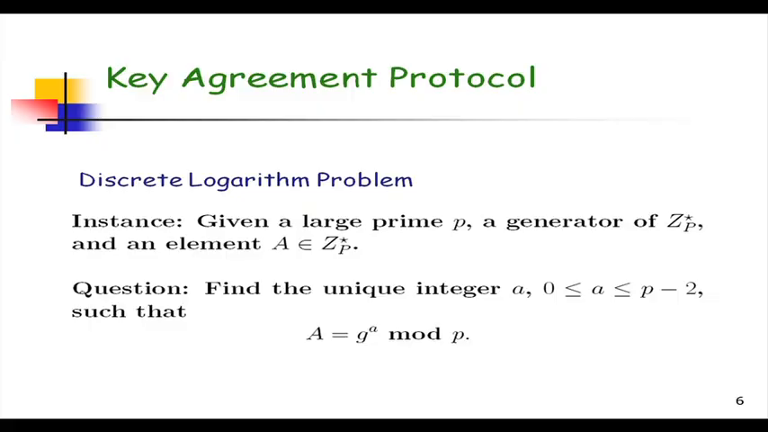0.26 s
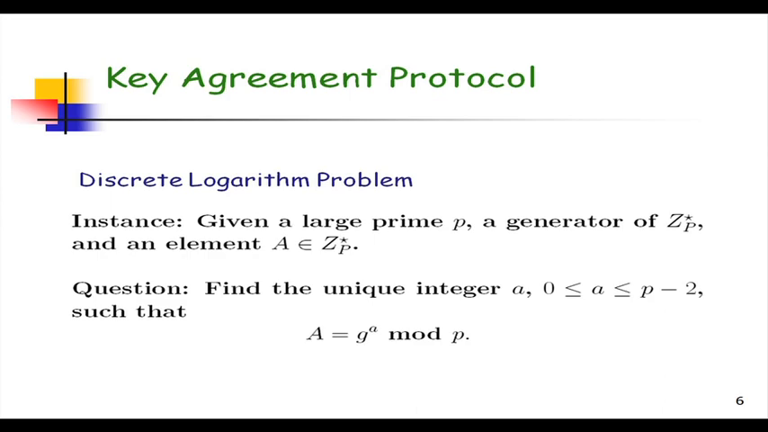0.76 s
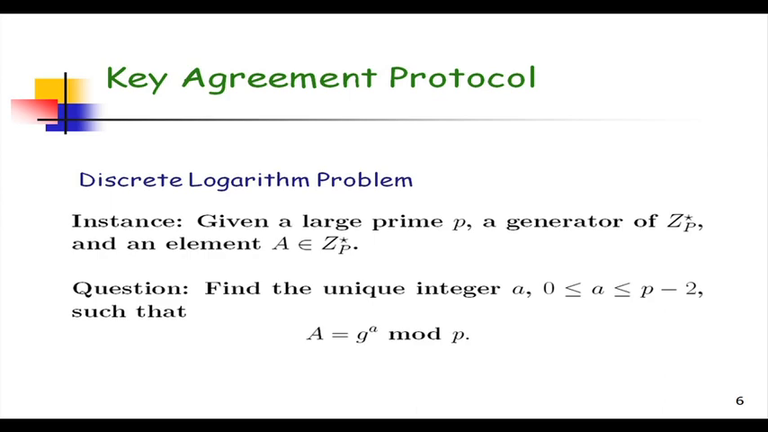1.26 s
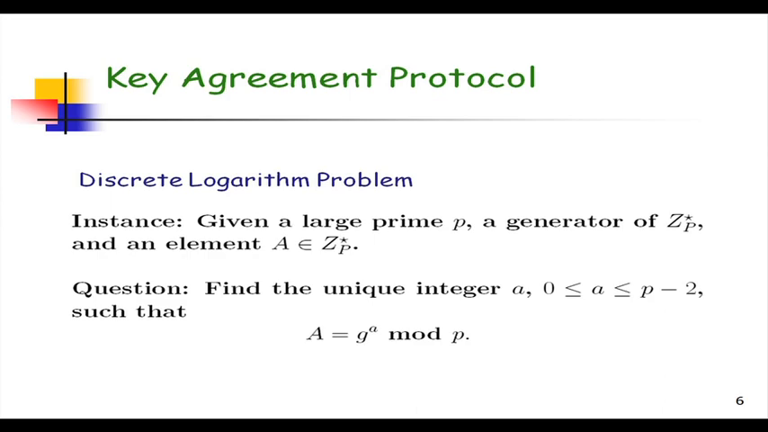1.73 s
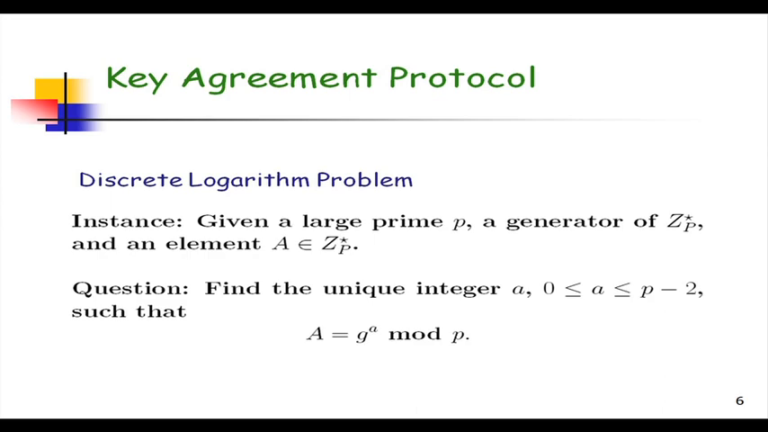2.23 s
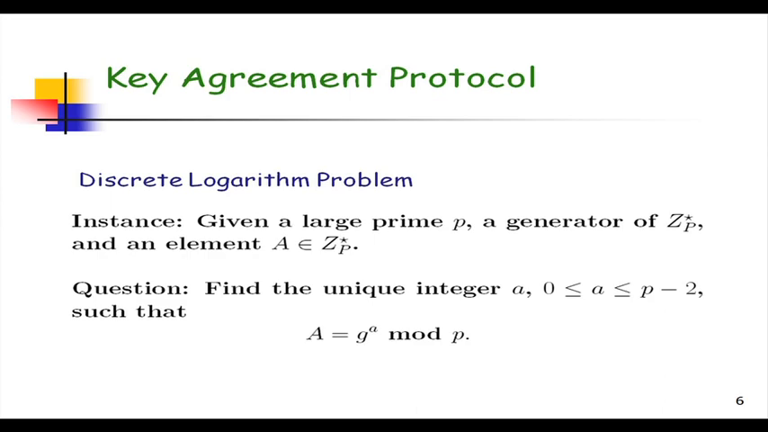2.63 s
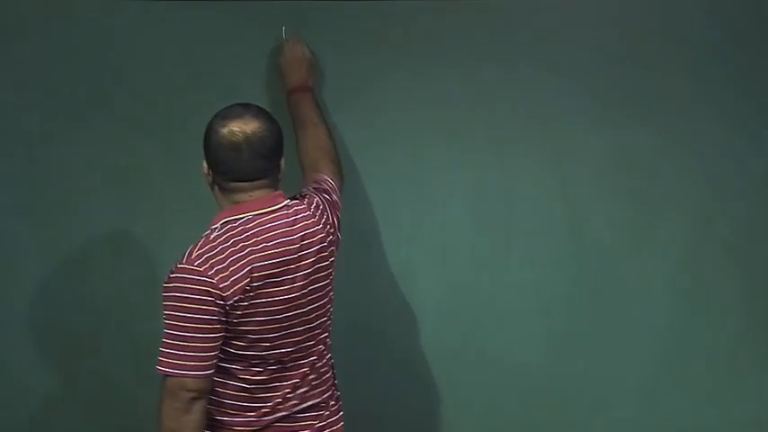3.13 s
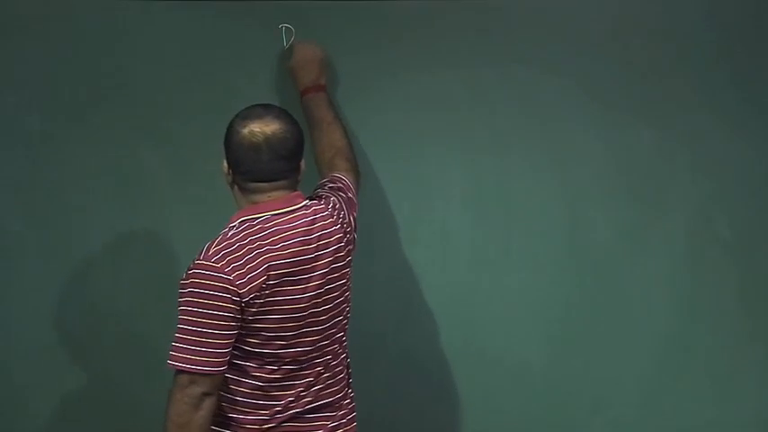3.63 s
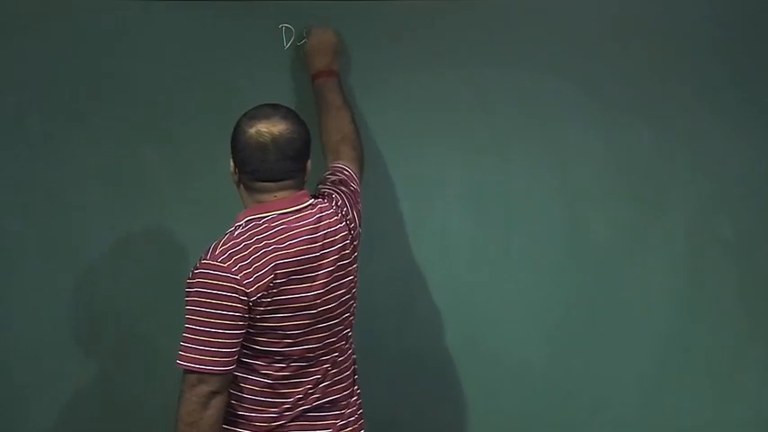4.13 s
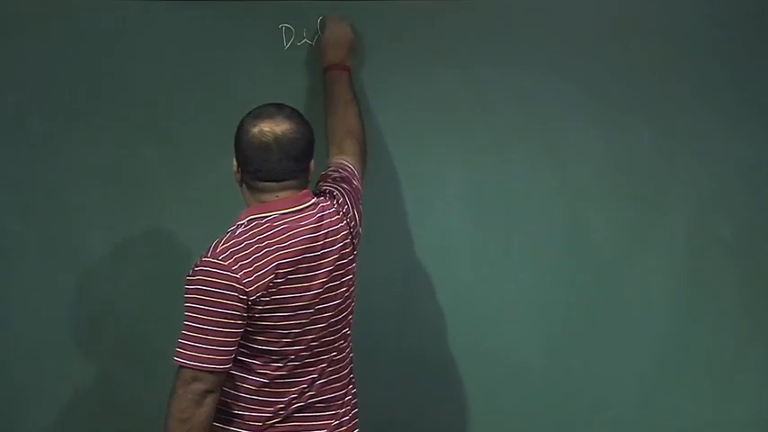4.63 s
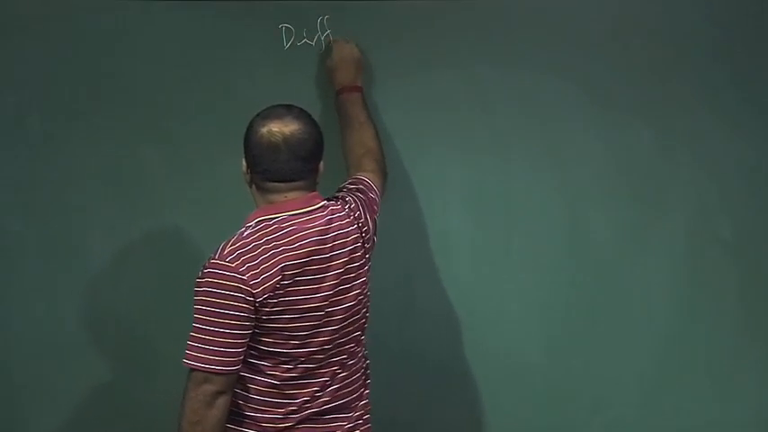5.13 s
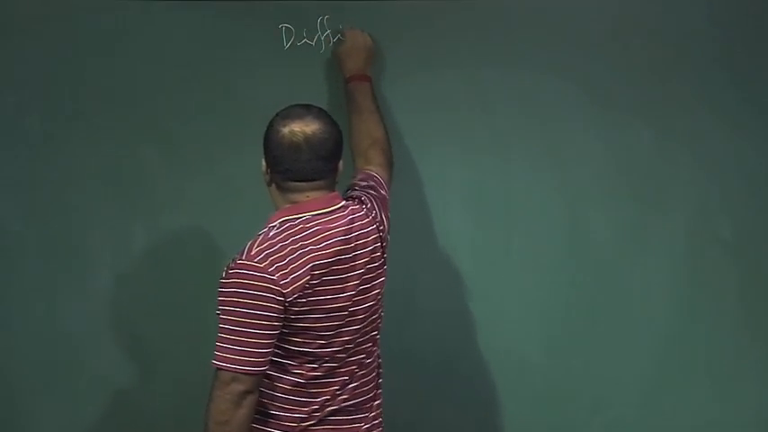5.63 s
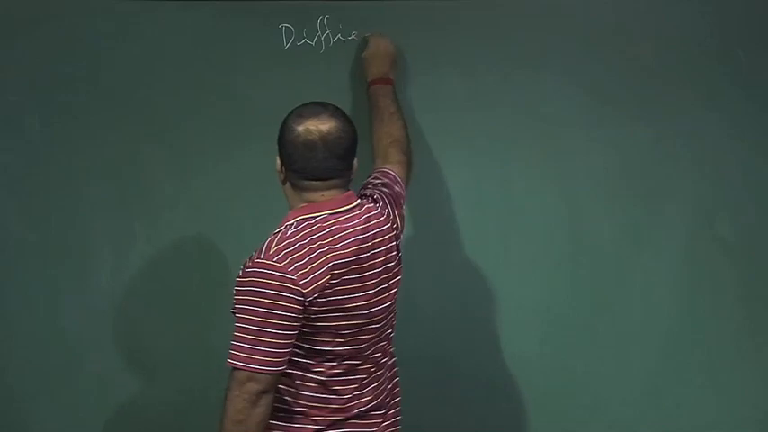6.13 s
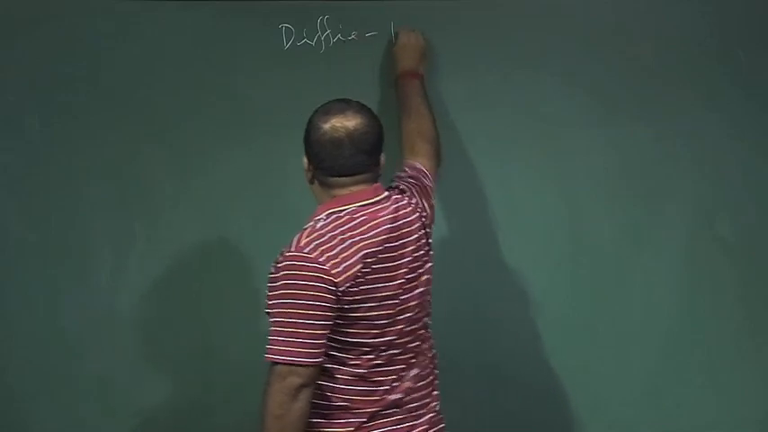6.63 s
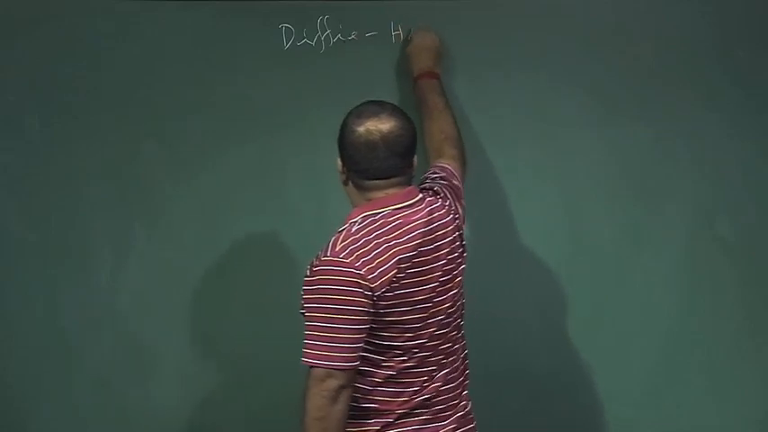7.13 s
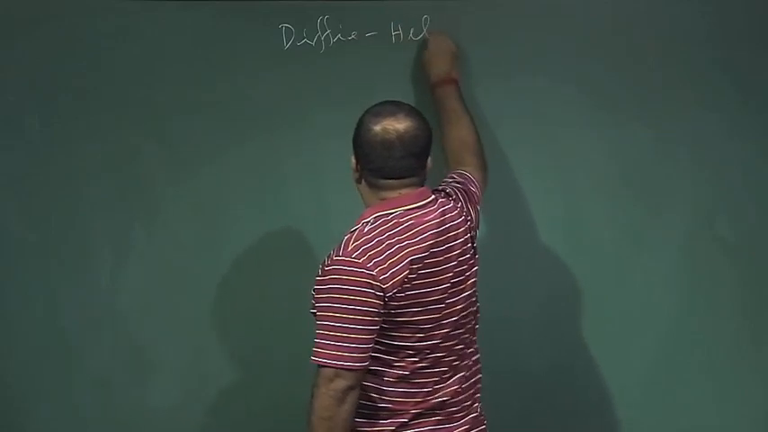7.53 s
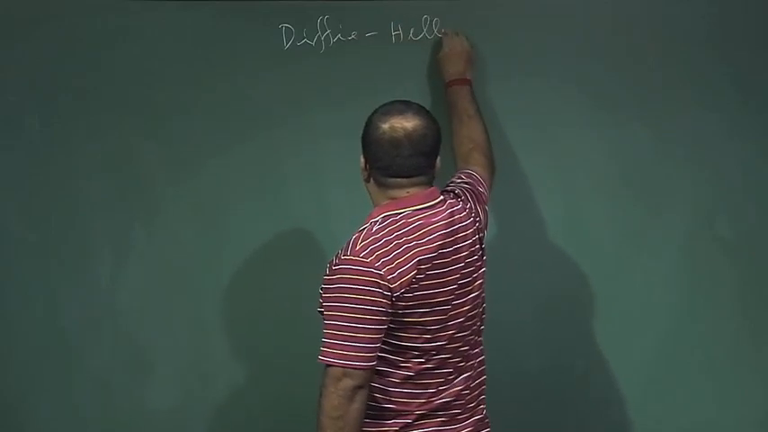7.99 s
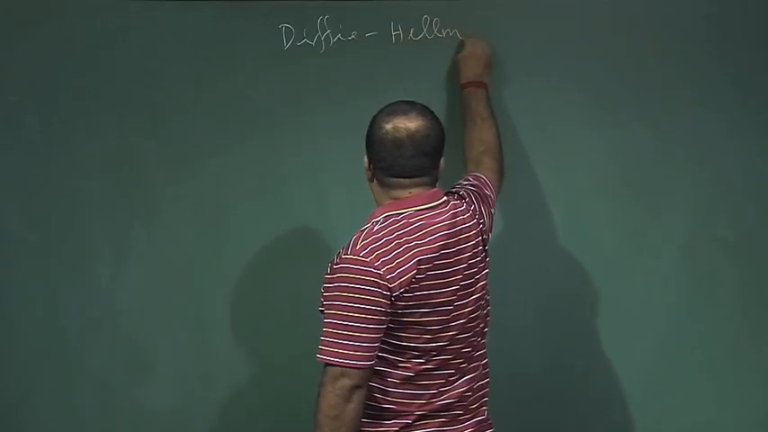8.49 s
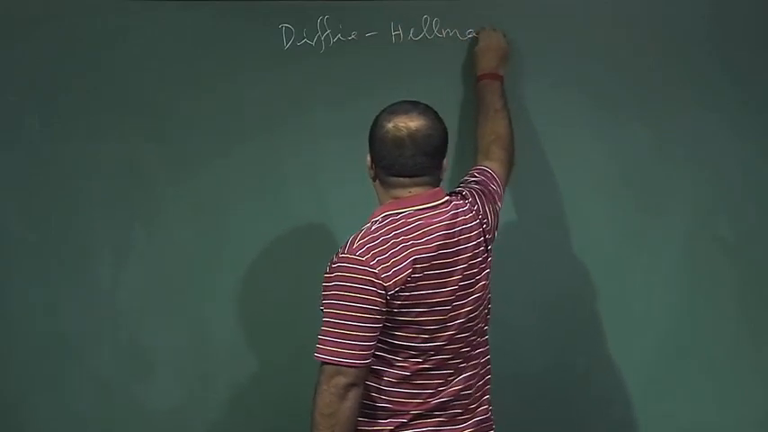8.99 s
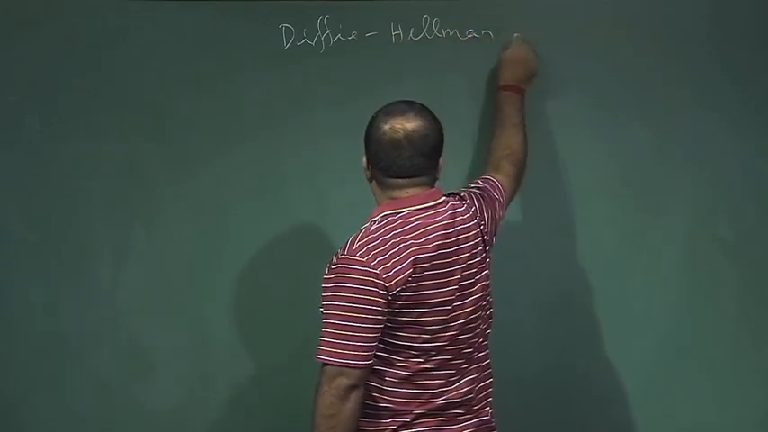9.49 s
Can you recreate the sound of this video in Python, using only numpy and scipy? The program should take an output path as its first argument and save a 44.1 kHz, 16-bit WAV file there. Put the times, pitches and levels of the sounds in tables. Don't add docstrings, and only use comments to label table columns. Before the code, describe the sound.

Close, dry cloth rubbing opens the scene as a shirt slides over a clipped-on microphone, strongest in the first 1.2 seconds, with a soft low bump near 0.5. From about 1.7 to 2.05 come tiny hard scrapes, then a faint click as chalk is lifted at 2.0. At 2.35 to 2.5 a cluster of deep, muffled thumps pushes on the capsule, the heaviest low event. The cloth quiets. At 3.0 a crisp chalk tap lands on the board, and writing continues with irregular taps, roughly two to five a second, until 7.0, strongest around 6.1. Between them are soft, gritty scratches and fizz. From 7.2 to 8.9 mostly light strokes remain, with isolated taps at 7.9 and 9.0. A last faint stroke fades around 9.35, with a slight sleeve creak near 9.7. Short room reverberation, low body rumble and quiet air persist throughout.

```python
import sys
import numpy as np
from scipy import signal
from scipy.io import wavfile
from scipy.ndimage import uniform_filter1d

SR = 44100
rng = np.random.default_rng(int(sys.argv[2]) if len(sys.argv) > 2 else 0)


def waveform_to_disk(signal):
    frames = np.transpose(np.atleast_2d(signal))
    scaled = np.clip(frames, -1, 1) * 32767
    samples = np.round(scaled).astype(np.int16)
    wavfile.write(sys.argv[1], SR, samples)


def convert_level_to_amplitude(level_db):
    exponent = np.asarray(level_db, float) / 20
    return 10 ** exponent


N = 429975


def evened(x):
    return x / np.sqrt(np.mean(x ** 2) + 1e-20)


def read(points, hz):
    f, *columns = np.transpose(points)
    return [np.interp(np.log(hz + 1), np.log(f), c) for c in columns]


def follow(rows):
    s, *columns = np.transpose(rows)
    return [np.interp(np.arange(N) / SR, s, c) for c in columns]


def add(mix, s, sound):
    part = mix[round(s * SR):][:len(sound)]
    part += sound[:len(part)]


def resonate(x, hz, width):
    turn = np.exp(2j * np.pi * np.cumsum(hz) / SR)
    r = np.exp(-np.pi * width / SR)
    return 2 * (turn * signal.lfilter([1 - r], [1, -r], x / turn)).real


def rung_twice(x, hz, width):
    return resonate(resonate(x, hz, width), hz, width)


def noise(colour, patchy_db, size=512):
    frames = 4 * N // size + 5
    hz = np.fft.rfftfreq(size, 1 / SR)
    a, b, patches = rng.standard_normal((frames, len(hz), 3)).T
    patches = uniform_filter1d(patches, size=9, axis=0)
    patches = evened(uniform_filter1d(patches, size=16, axis=1))
    z = (a + 1j * b) * convert_level_to_amplitude(read(colour, hz)[0][:, None] + patchy_db * patches)
    return evened(signal.istft(z, nperseg=size, noverlap=3 * size // 4)[1][:N])


def tail(bands, size, count):
    hz, t, z = signal.stft(rng.standard_normal(count), SR, nperseg=size)
    db, t60 = read(bands, hz)
    decayed = z * convert_level_to_amplitude(db[:, None] - 60 * t / t60[:, None])
    return signal.istft(decayed, SR, nperseg=size)[1][:count]


def move(length, top):
    u = np.arange(0, length, 1 / SR) / length
    top = np.clip(top, .02, .98)
    rise_and_fall = np.where(u < top, u / top, (1 - u) / (1 - top))
    return np.sin(np.pi / 2 * rise_and_fall) ** 1.2


def uneven_slips(count):
    return rng.standard_normal(count), np.minimum(rng.exponential(1, count), 4)


# hz, t60_s, level_db
RINGS = [
    (1400, 0.0036, -10.5),
    (1887, 0.0034, -2),
    (3280, 0.0015, 5.5),
    (4550, 0.0026, 5.5),
    (7190, .0013, 9.5),
    (10120, 0.00065, 12),
    (13460, 0.00087, 3),
]
# hz, level_db, t60_s
SCATTER = [(300, -21.5, 0.14), (864, 1.5, 0.13), (1190, -6, 0.12), (2130, -2, 0.071), (4000, -4.5, 0.071),
           (7000, -3.5, 0.017), (13600, -4.5, .025)]
# hz, level_db, t60_s
ROOM = [(300, -9.5, 1), (800, -10.5, 1), (1230, 0, 0.69), (1570, 2.5, .75), (2070, -5, 0.82),
        (2960, -4.5, 0.72), (5000, -7.5, 0.67), (7000, 4, 0.14), (13700, -1, 0.39)]
# delay_s, level_db
ECHOES = [(0.0126, -40), (0.0374, -21.5), (.062, -50)]


def tap(blow_db, low_db, high_db, tick_db, room_db):
    t = np.arange(30000) / SR
    u = t[:256]
    shares_db = 0, 0, low_db, high_db, tick_db, tick_db, tick_db
    peak_s = 0.00026
    rings = np.array([-np.cos(2 * np.pi * hz * (u - peak_s)) * convert_level_to_amplitude(db + share_db - 60 * u / t60)
                      for (hz, t60, db), share_db in zip(RINGS, shares_db)])
    rings *= np.sin(np.pi / 2 * np.clip(u / 0.00035, 0, 1)) ** 2
    rings[:2] *= np.clip(u / 0.0003, .3, 1)

    path = convert_level_to_amplitude(-18.5) * tail(SCATTER, size=64, count=len(t)) * np.clip(t / 0.00013, 0, 1)
    fill = np.clip((t - .018) / 0.045, .14, 1)
    path += convert_level_to_amplitude(room_db - 32) * tail(ROOM, size=256, count=len(t)) * fill
    path[0] = 1
    path[round(rng.uniform(.00018, .00025) * SR)] += .6
    path[round(rng.uniform(.0031, .0039) * SR)] += .24
    sound = signal.oaconvolve(path, rings.sum(0))[:len(t)]

    snap_hz, snap_s, snap_t60 = 1713, .00034, .007
    snap = convert_level_to_amplitude(-6.5 - 0.38 * (tick_db + 23.5) - 60 * u / snap_t60) * np.cos(2 * np.pi * snap_hz * (u - snap_s))
    sound[:256] -= snap * np.clip(u / snap_s, 0, 1) ** 2

    board_ring = np.sin(2 * np.pi * 1720 * u[:110]) * signal.windows.hann(110)
    for delay, db in ECHOES:
        add(sound, delay, convert_level_to_amplitude(db) * board_ring)

    swing = .1 + 1 - np.exp(-(t / .052) ** 1.6)
    low_swing = np.cos(2 * np.pi * swing) * np.exp(-t / .055) + .45 * np.exp(-t / .002)
    low_swing *= (1 - np.exp((peak_s - t) / 0.0001)).clip(0)
    return convert_level_to_amplitude(blow_db + 6.5) * (sound + convert_level_to_amplitude(-13.0) * low_swing)


# blow_db, low_ring_rel_db, high_ring_rel_db, tick_rel_db, room_rel_db
PICK_UP = (-29, -30, -36, -23, -5)
# start_s, blow_db, low_ring_rel_db, high_ring_rel_db, tick_rel_db
TAPS = [(3.0036, -18, 1, -30.5, -11.5), (3.318, -23.5, -8, -45, -18.5), (3.5208, -38.5, -40, -28, -36),
        (3.6589, -15.5, -27, -12.5, -15), (4.0386, -15.5, -2.5, -13.5, -16), (4.2161, -18, -1, -7.5, -11.5),
        (4.491, -19, 0, -14.5, -13), (4.6657, -18.5, 2, -6.5, -11.5), (4.9544, -18, -5.5, -8.5, -15.5),
        (5.1505, -20, -40, -9.5, -17.5), (5.5297, -15, 1.5, -23, -12.5), (5.7068, -20.5, -42, -9, -20),
        (6.0857, -13, -9.5, -14, -12.5), (6.2985, -15.5, 2, -16, -9), (6.568, -15, -1.5, -18, -11),
        (6.8214, -16.5, -8.5, -13.5, -13), (7.0072, -17, -10.5, -10.5, -11),
        (7.9126, -18.5, -14.5, -28, -20.5), (8.9953, -16, -16.5, -30, -23)]


def landings():
    out = np.zeros(N)
    lag_s = 0.000938
    add(out, 2.022 + lag_s, tap(*PICK_UP))
    for s, blow_db, *shares_db in TAPS:
        room_db = 1.8 + 0.65 * max(-22.5 - blow_db, 0)
        add(out, s + lag_s, tap(blow_db, *shares_db, room_db))
    return out


# start_s, length_s, fizz_db, stick_resonance_hz, drag_rel_db
STROKES = [(3.065, 0.15, -68, 4400, 7), (3.333, 0.095, -62.5, 3700, -2), (3.404, .11, -59.5, 4340, -17),
           (3.723, 0.072, -77, 3980, -2), (3.848, .12, -77, 4060, -5), (4.3, 0.13, -72, 4000, -2),
           (4.74, 0.28, -68.5, 3800, 4), (5.195, 0.076, -69, 4190, -3), (5.287, 0.16, -73, 4130, -1),
           (5.742, 0.16, -76, 3750, 14), (5.9, 0.073, -74, 3760, 4), (7.202, 0.16, -70.5, 4340, 3),
           (7.313, 0.093, -66.5, 3500, 8.5), (7.387, 0.084, -66, 4200, -5), (7.444, 0.16, -67.5, 4500, -5),
           (7.57, 0.1, -72, 3630, 16), (7.647, 0.14, -61.5, 4530, -1.5), (7.771, 0.066, -69, 4400, 1),
           (8.045, .16, -78, 3650, 6), (8.252, .11, -73, 3660, 2), (8.387, 0.29, -71.5, 4540, -2),
           (8.562, 0.26, -71, 4650, 3), (8.79, 0.13, -72.5, 4670, .6), (9.132, 0.24, -79, 3900, 6)]
# multiple_of_resonance, width_hz, level_db
STICK = [(1, 603, 3), (1.72, 1400, -12), (2.4, 1400, -17.5), (2.9, 1567, -18)]
# hz, level_db_per_hz
GRIT = [(200, 3), (1000, 0), (1800, 2.5), (3000, 7), (8000, -15), (16000, -27)]
# hz, level_db_per_hz
FIZZ = [(2000, -19), (4000, 8.5), (7000, 5), (12000, -3.5), (15000, -9), (16500, -17)]


def strokes():
    speed, load = np.zeros(N), np.zeros(N)
    u = np.arange(SR // 2) / SR
    wait_s, rise_s, fall_s = 0.059, 0.048, 0.13
    pull = (1 - np.exp(-(u / rise_s) ** 2)) * np.exp(-u / fall_s)
    for s, blow_db, _, _, tick_db in TAPS:
        add(speed, s + wait_s, convert_level_to_amplitude(-43 + blow_db + 0.31 * tick_db) * pull)
    load += convert_level_to_amplitude(5.5) * speed
    for s, length, db, _, drag_db in STROKES:
        add(speed, s, convert_level_to_amplitude(db) * move(length, 0.59))
        add(load, s, convert_level_to_amplitude(db + drag_db) * move(length, 0.59))

    stroke_hz = [(s + length / 2, hz) for s, length, _, hz, _ in STROKES]
    pull_hz = [(row[0] + rise_s, 3900) for row in TAPS]
    hz, = follow(sorted(stroke_hz + pull_hz))
    slips, spread = uneven_slips(N)
    slips = slips * convert_level_to_amplitude(2.5 * spread)
    ring = sum(convert_level_to_amplitude(db) * evened(rung_twice(slips, k * hz, width)) for k, width, db in STICK)
    drag, fizz = noise(GRIT, patchy_db=1.5), noise(FIZZ, patchy_db=2.1)
    return speed * (1.08 * fizz + convert_level_to_amplitude(-7.0) * ring) + load * drag


# start_s, level_db, pitch_hz
CRUMBS = [
    (1.29, -38, 7000),
    (2.095, -45, 11100),
    (3.377, -39, 9000),
    (3.868, -40, 5000),
    (7.801, -39, 5000),
    (8.898, -43, 4470),
]


def crumbs():
    out, u = np.zeros(N), np.arange(64) / SR
    for s, db, hz in CRUMBS:
        add(out, s, convert_level_to_amplitude(db - 60 * u / 0.0013) * np.sin(2 * np.pi * hz * u))
    return out


# start_s, length_s, fine_rub_db, fastest_point_share (0-1)
RUB = [(-.15, 0.5, -55, 0.43), (0.255, 0.32, -55.5, 0.72), (.5, 0.4, -56, 0.31), (0.845, 0.34, -53.5, 0.19),
       (1.285, 0.24, -61.5, 0), (1.724, 0.13, -61.5, 0.3), (1.846, 0.2, -61, 0.18), (2.02, .33, -65.5, 0.7),
       (2.407, 0.19, -67.5, 0.8), (2.578, 0.15, -67.5, 0.65), (2.77, 0.37, -76, 0.2),
       (9.67, 0.08, -77, 0.2)]
# hz, level_db_per_hz
FINE = [(1180, -3), (2000, -7.5), (2280, -1), (2460, -4), (3980, -4), (5780, -1.5), (7570, -7.5),
        (13100, -11.5), (15200, -16), (16000, -23)]
# start_s, coarse_rub_db
ARM = [(0, -60), (.7, -61.5), (1.15, -62), (1.3, -58), (1.75, -60), (1.85, -63), (2.15, -55.5), (2.36, -65),
       (2.99, -64.5)]
# hz, level_db_per_hz
COARSE = [(120, -39), (200, -9), (254, -4), (414, 1), (499, -4), (1310, -8), (3070, -21), (4000, -21),
          (5200, -42), (8800, -120)]


def shirt():
    arm_moves = np.arange(N) / SR < ARM[-1][0]
    slide = convert_level_to_amplitude(-77) * arm_moves
    for s, length, db, top in RUB:
        heard = move(length, top)[round(max(-s, 0) * SR):]
        add(slide, max(s, 0), convert_level_to_amplitude(db) * heard)
    fine, coarse = noise(FINE, patchy_db=1.3), noise(COARSE, patchy_db=1.4)
    return slide * fine + arm_moves * convert_level_to_amplitude(follow(ARM)[0]) * coarse


def pulses(events):
    out, t = np.zeros(N), np.arange(-3000, 3000) / SR
    for s, db, hz, cycles in events:
        envelope = np.exp(-(1.55 * t * hz / cycles) ** 2)
        add(out, s + t[0], convert_level_to_amplitude(db) * np.sin(2 * np.pi * hz * t + 3.1) * envelope)
    return out


# centre_s, level_db, pitch_hz, length_cycles
BUMPS = [(0.482, -27.5, 51.3, 1.2), (0.834, -37.5, 91, 0.8), (2.363, -25.5, 84, 1.45),
         (2.385, -17.5, 35.3, 0.57), (2.403, -21.5, 154, 1.54), (2.424, -13.5, 53, 0.98),
         (2.455, -16, 34.5, .8), (2.478, -9.5, 56, 0.52), (2.49, -20.5, 116, 1.16), (2.41, -41, 255, 3),
         (2.495, -42, 263, 2), (2.523, -24, 40, 1.3), (7.162, -33.5, 162, 0.84)]


def bumps():
    return pulses(BUMPS)


# start_s, level_db, length_s, spit_rel_db
SCRAPES = [
    (1.743, -44.5, 0.023, -14),
    (1.762, -45, 0.031, -8),
    (1.865, -48, 0.0041, -18),
    (1.896, -47, 0.0071, -5.5),
    (2.029, -48, 0.0092, -42),
]
# hz, width_hz, level_db
EDGE = [(1430, 96, -5.5), (3060, 140, -12.5), (4770, 55, -16), (5800, 49, -25), (7550, 170, -24)]


def scrapes():
    count_all = N // 4
    slips, spit = np.zeros((2, count_all))
    for s, db, length, spit_db in SCRAPES:
        count = round(length * SR)
        run = convert_level_to_amplitude(db + 4.1 * rng.standard_normal(2000)) * rng.choice([-1, 1], 2000)
        run = run[:count] * signal.windows.tukey(count, .4)
        add(slips, s, run)
        add(spit, s, convert_level_to_amplitude(spit_db) * run)
    flat = np.ones(count_all)
    ring = sum(convert_level_to_amplitude(db + 14.5) * rung_twice(slips, hz * flat, width + 550) for hz, width, db in EDGE)
    return np.pad(ring + resonate(spit, 8500 * flat, 8000), (0, N - count_all))


# start_s, length_s, level_db, pitch_hz, width_hz
CREAKS = [(0.302, .35, -63.5, 1070, 200), (1.172, 0.57, -64.5, 1330, 250), (1.279, 0.23, -66, 2050, 300),
          (2.045, 0.38, -70, 3540, 250), (2.76, 0.25, -70, 1160, 300), (3.419, 0.11, -57.5, 4350, 700),
          (5.883, 0.12, -55, 444, 400), (7.578, 0.22, -64, 1750, 300), (8.384, .18, -70, 4500, 800),
          (8.498, 0.15, -66, 2730, 900), (8.578, 0.25, -72, 1230, 120), (8.583, 0.22, -68, 4700, 700),
          (8.776, 0.14, -72, 4550, 700), (7.247, .12, -70, 8000, 1500), (7.68, .1, -77, 7600, 1500),
          (9.327, 0.25, -64, 500, 510), (9.67, 0.1, -61.5, 900, 890)]


def creaks():
    out = np.zeros(N)
    for s, length, db, hz, width in CREAKS:
        speed = move(length, 0.34)
        slips, spread = uneven_slips(len(speed))
        slips = slips * convert_level_to_amplitude(3.0 * spread)
        ring = rung_twice(slips, hz * np.ones(len(speed)), width)
        add(out, s, convert_level_to_amplitude(db) * speed * evened(ring))
    return out


# centre_s, level_db, pitch_hz, length_cycles
KNOCKS = [(0.665, -49.5, 369, 21), (2.218, -39.5, 37.2, 1.6), (2.028, -28.5, 300, 0.41),
          (5.372, -38.5, 196, 0.39), (5.93, -50, 290, 8.2), (8.909, -40.5, 262, 0.34),
          (9.719, -47, 604, 0.89)]


def knocks():
    return pulses(KNOCKS)


# start_s, rumble_db
RUMBLE = [(0.0, -50), (0.11, -55.5), (0.49, -55), (2.06, -56.5), (2.2, -58.5), (2.41, -51.5), (2.69, -52.5),
          (3.09, -54.5), (3.64, -61.5), (4.24, -51), (5.35, -60.5), (6.41, -53.5), (6.63, -52), (6.92, -58),
          (8.17, -63), (8.91, -62), (9.15, -59), (9.75, -64)]
# hz, level_db_per_hz
RUMBLE_COLOUR = [(8, -11), (25, 1), (45, -6.5), (90, -9.5), (180, -18.5), (400, -30), (1000, -64)]


def rumble():
    return convert_level_to_amplitude(follow(RUMBLE)[0] + 5.5) * noise(RUMBLE_COLOUR, patchy_db=2.5, size=2048)


# hz, level_db_per_hz
AIR = [(59, -25), (100, -0.5), (289, -13), (433, -8.5), (768, -16.5), (1330, -17.5), (2420, -23.5),
       (10900, -34.5), (15000, -39.5), (16000, -52)]


def air():
    return convert_level_to_amplitude(-63.0) * noise(AIR, patchy_db=3)


def scene():
    chalk = landings() + strokes() + crumbs()
    wearer = shirt() + bumps() + scrapes() + creaks()
    return (chalk + wearer + knocks() + rumble() + air())[None]


def band_limit(x):
    return signal.sosfilt(signal.butter(12, 16830, fs=SR, output="sos"), x)


def record(dry):
    low_pass = signal.firwin(255, 16650, window=("kaiser", 8), fs=SR)
    limited = signal.oaconvolve(dry, low_pass[None], "same")
    return band_limit(limited)


dry = scene()
out = record(dry)
waveform_to_disk(out)
```